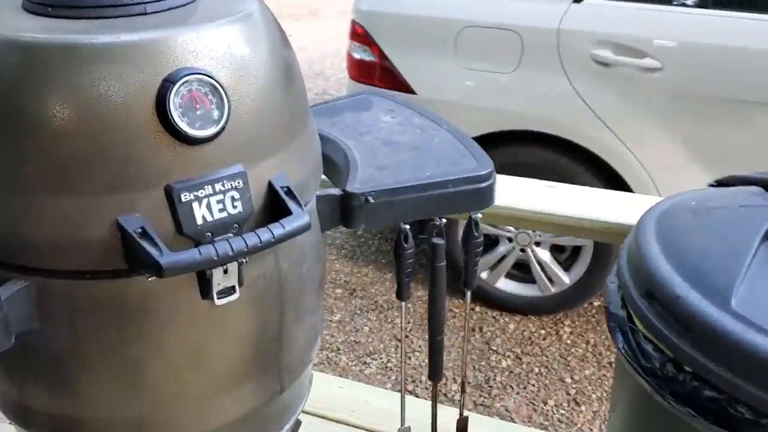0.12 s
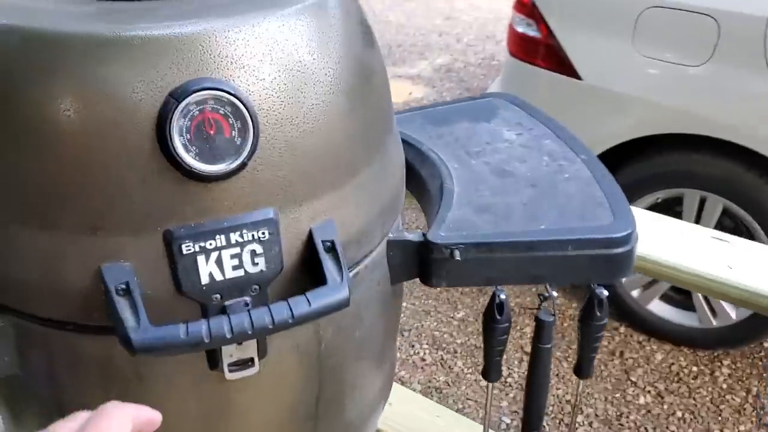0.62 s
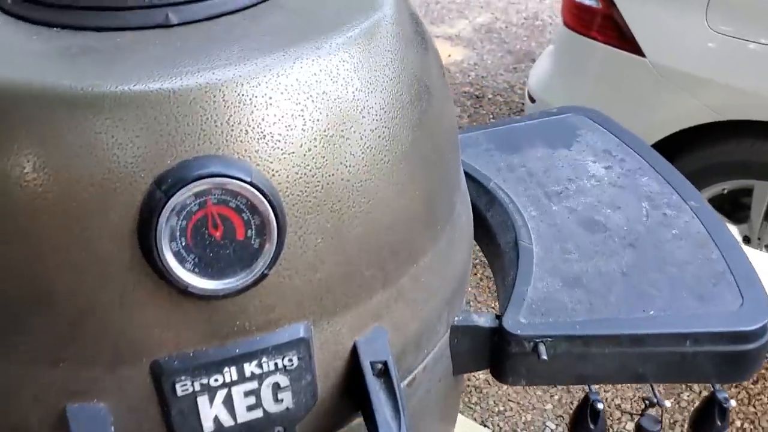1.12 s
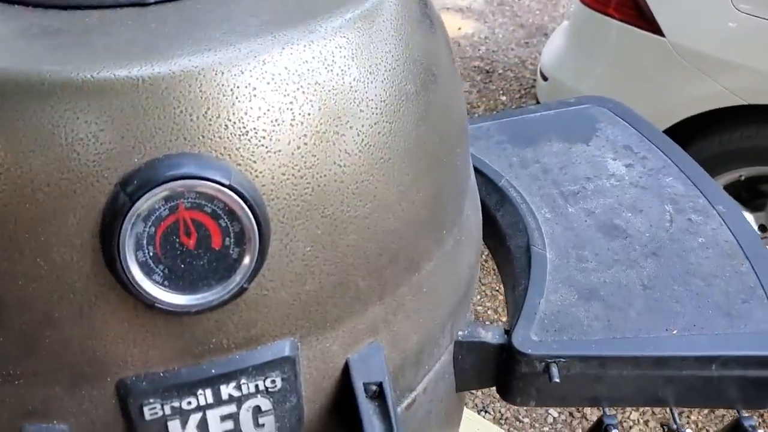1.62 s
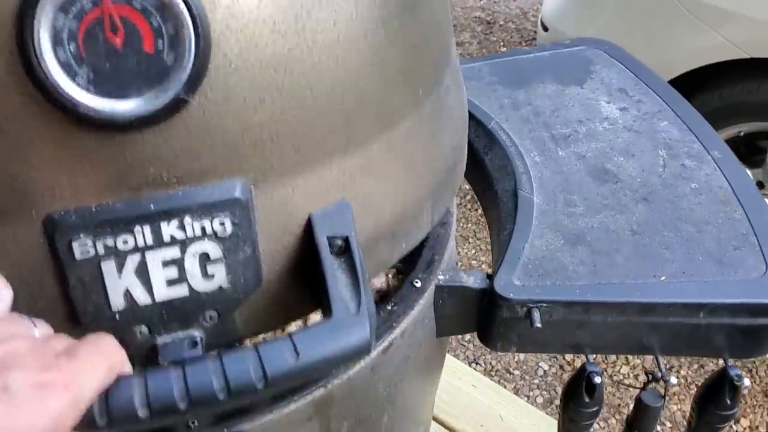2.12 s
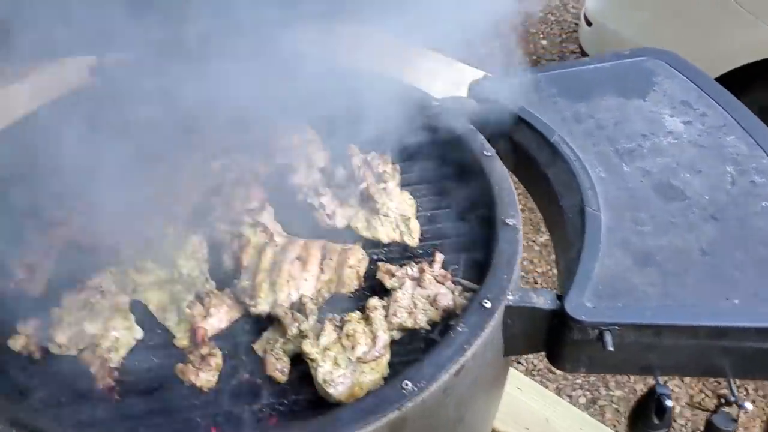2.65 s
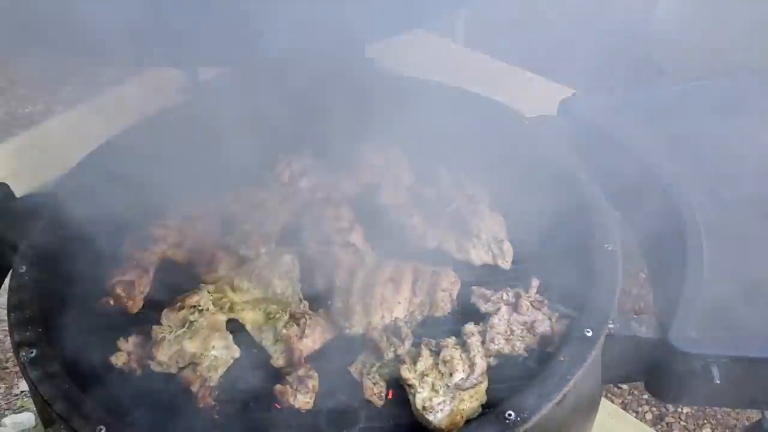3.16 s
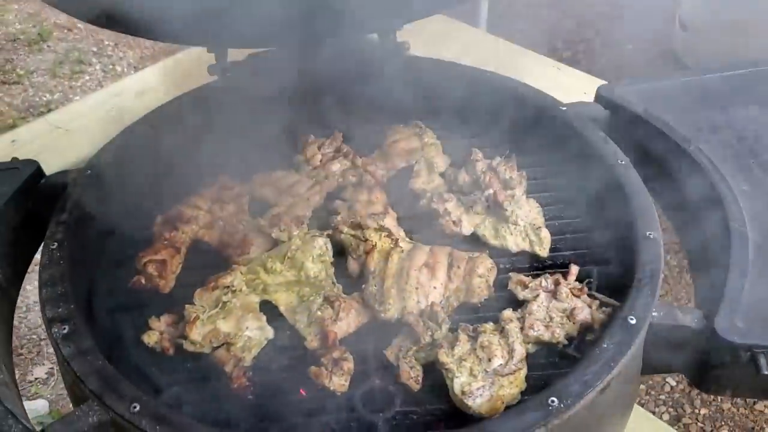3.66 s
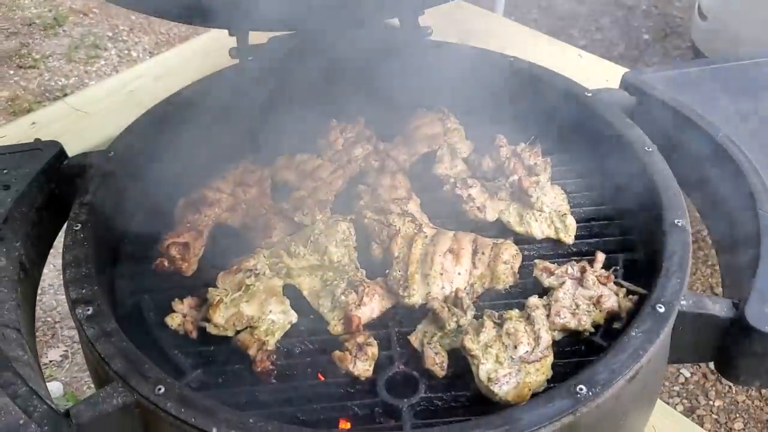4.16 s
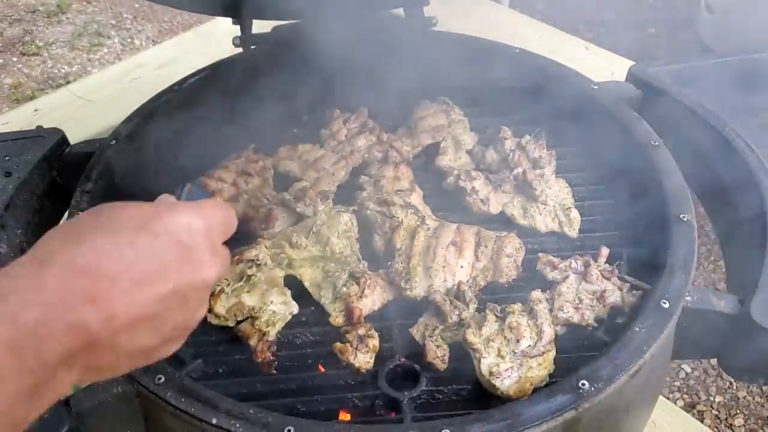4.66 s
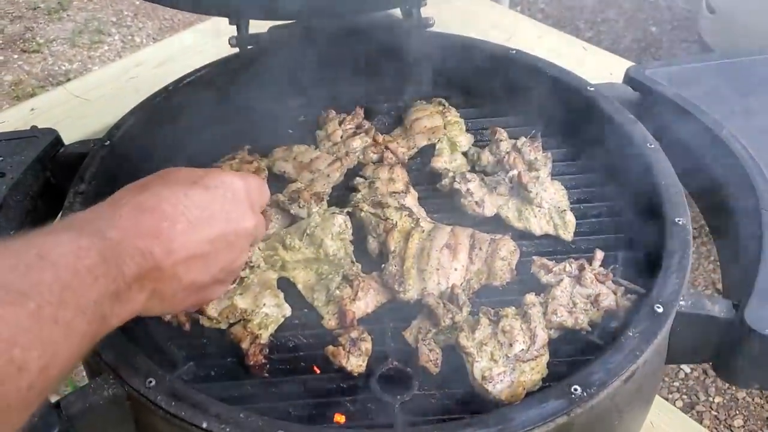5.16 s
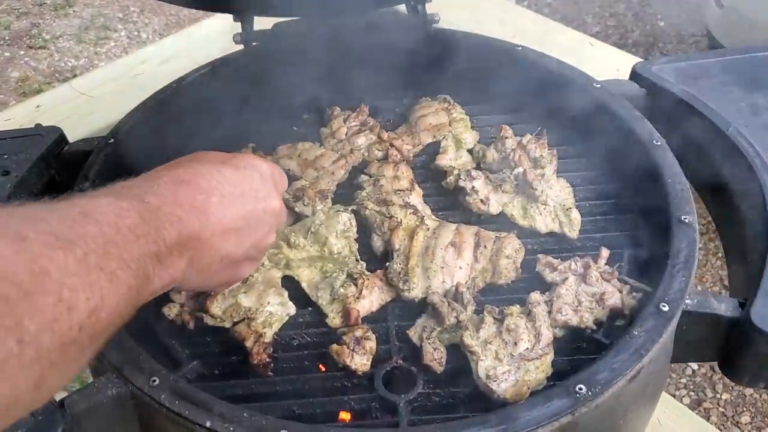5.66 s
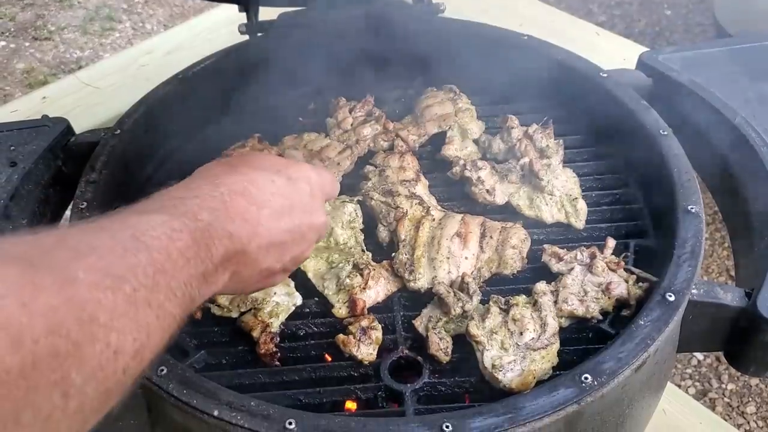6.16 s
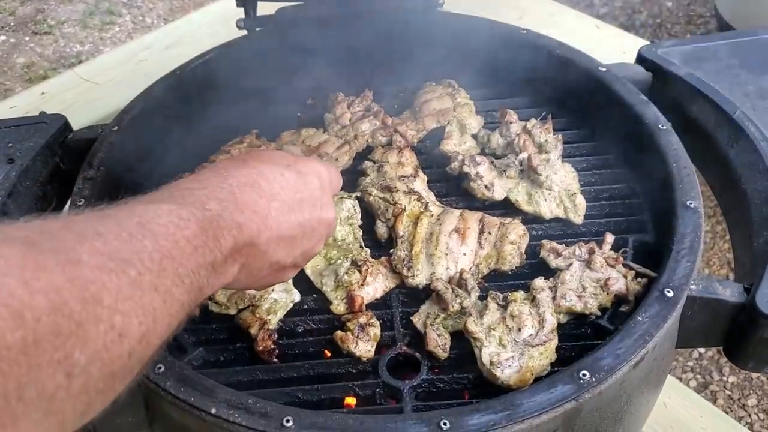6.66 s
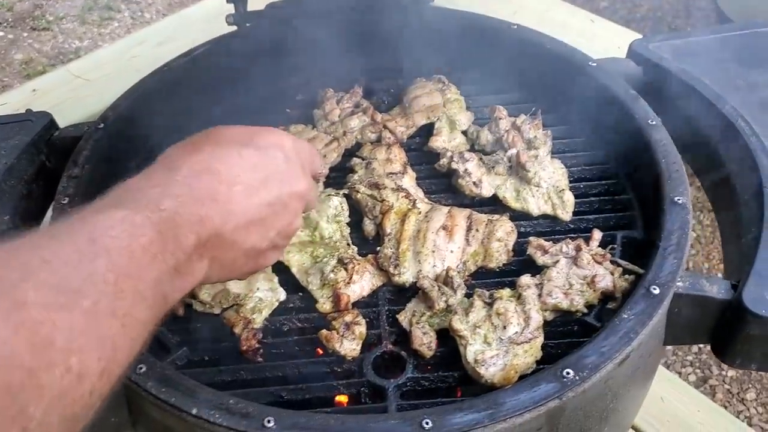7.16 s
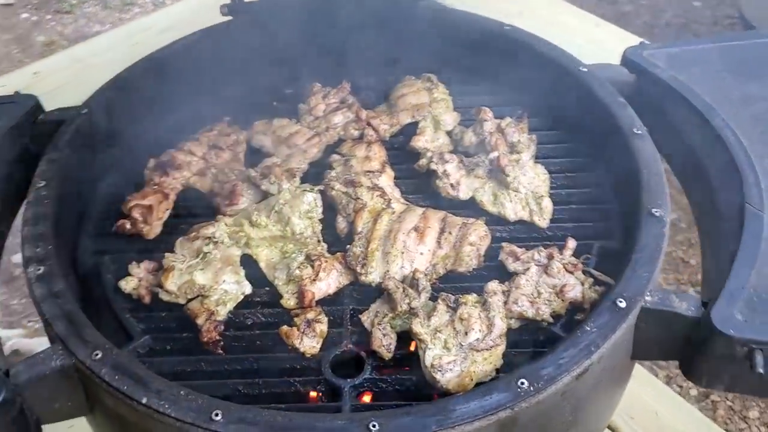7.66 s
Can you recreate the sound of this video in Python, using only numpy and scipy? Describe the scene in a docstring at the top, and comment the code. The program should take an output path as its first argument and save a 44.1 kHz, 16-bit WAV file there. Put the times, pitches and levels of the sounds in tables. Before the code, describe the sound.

Gravelly footsteps and hollow knocks, a bird whistle, a steel catch rubbing, then a squeaking lid opens onto loud, bright, spitting meat sizzle.

```python
"""Meat sizzles on a charcoal grill in a yard (bubbling noise, ringing bubbles) and air stirs (low noise in puffs).
Someone steps up over gravel and boards (grains, ringing modes) amid dull bumps and hollow knocks; a bird
whistles (unsteady sines) as the steel catch slides (rubbed resonances). The lid lifts on a squeaking hinge
(gliding sines) and the hiss opens up; fat spits (short cracks, clicks), feet shift, the bird whistles again,
a tool scrapes the grate (coarse noise), the last time near the end."""
import sys
import numpy as np
from scipy import signal
from scipy.fft import rfft, irfft, next_fast_len
from scipy.io import wavfile
from scipy.ndimage import uniform_filter1d, map_coordinates

SR = 44100
rng = np.random.default_rng(int(sys.argv[2]) if len(sys.argv) > 2 else 0)


def undo_db(level):
    """Turn decibels back into plain size, where 20 dB means ten times bigger."""
    steps = np.asarray(level, float) / 20
    return 10 ** steps


def file_out(sig):
    """Save sig as 16-bit WAV at sys.argv[1]."""
    # one column per channel
    cols = np.atleast_2d(sig).T
    # limit, then scale
    lim = np.clip(cols, -1, 1)
    pcm = np.round(lim * 32767).astype(np.int16)
    wavfile.write(sys.argv[1], SR, pcm)


N = 343539
TOP_HZ = 15780  # band limit


def unit(x):
    """Scales to rms 1."""
    return x / np.sqrt(np.mean(x ** 2) + 1e-20)


def along(points, hz):
    """Interpolates (f/Hz, value) points on a log frequency axis."""
    f, v = np.transpose(points)
    return np.interp(np.log(hz + 1), np.log(f + 1), v)


def curves(rows):
    """One value per sample for each column after the time."""
    s, *cols = np.transpose(rows)
    return [np.interp(np.arange(N) / SR, s, c) for c in cols]


def tent(start, peak, end):
    """0 outside, rising straight to 1 at the peak."""
    return np.interp(np.arange(N) / SR, [start, peak, end], [0, 1, 0])


def sides(pan_db):
    """Left and right gains for a left minus right level."""
    return undo_db(np.array([pan_db / 2, -pan_db / 2]))


def wobble(rate):
    """Smooth random curve, rate knots a second."""
    coarse = np.arange(0, N + 32, 32)
    knots = rng.standard_normal(int(N * rate / SR) + 4)
    return np.interp(np.arange(N), coarse, map_coordinates(knots, [coarse * rate / SR]))


def filtered(x, response):
    """x times a complex response of frequency."""
    m = next_fast_len(N + 8192)
    return irfft(rfft(x, m) * response(np.fft.rfftfreq(m, 1 / SR)), m)[..., :N]


def crackle(rate, spread_db, share):
    """Two unrelated hisses swelled by bubble bursts (rate a second) that both sides hear at the same time."""
    bursts = (rng.random(N) < rate / SR) * undo_db(spread_db * np.tanh(rng.standard_normal(N)))
    puff = unit(signal.lfilter([1], [1, -.95], bursts))  # each burst dies in about a millisecond
    share = np.clip(share, 0, 1)
    return rng.standard_normal((2, N)) * np.sqrt(1 - share + share * puff ** 2)


def patchy(pair, depth_db):
    """Spots of the grate seethe up and fall back, each in its own range of pitch."""
    z = signal.stft(pair, nperseg=512)[2]
    field = uniform_filter1d(rng.standard_normal(z.shape[1:]), size=5, axis=0)
    field = uniform_filter1d(field, size=6, axis=1)
    return signal.istft(z * undo_db(depth_db * unit(field)), nperseg=512)[1][:, :N]


# left-right likeness: f/Hz, correlation
LIKENESS = [(60, 0.98), (340, 0.53), (700, 0.55), (1050, 0.13), (1400, 0.62), (2050, 0.12), (2400, 0),
            (4000, 0.0083), (15000, 0.014)]


def coloured(pair, spectrum, alike=LIKENESS, tilt=((1, 0),), lag=0):
    """Two noises become a stereo sound of rms 1 in the middle; the left side hears it lag seconds late."""
    m = next_fast_len(N)
    hz, (a, b) = np.fft.rfftfreq(m, 1 / SR), rfft(pair, m)
    turn = np.arccos(np.clip(along(alike, hz), -1, 1)) / 2
    mid, side = a * np.cos(turn), b * np.sin(turn)
    late = np.exp(-1j * np.pi * hz * lag)
    gain = undo_db(along(spectrum, hz)) * sides(along(tilt, hz))
    both = irfft(gain * [(mid + side) * late, (mid - side) / late], m)[:, :N]
    return both / np.std(both.mean(0))


def echoes(x, t60, wet_db):
    """The yard answers with a short scattered tail, different on each side."""
    t = np.arange(SR // 2) / SR
    tail = rng.standard_normal((2, len(t))) * undo_db(-60 * t / t60)
    return x + undo_db(wet_db) * signal.fftconvolve(x, tail / np.linalg.norm(tail[0]), axes=1)[:, :N]


def whistles(tables, waver, flutter_db, octave):
    """One gliding sine per table of (t/s, f/Hz, level/dB, pan/dB), unsteady in pitch and strength."""
    out = np.zeros((2, N))
    for rows in tables:
        s, *cols = np.transpose(rows)
        span = slice(round(s[0] * SR), round(s[-1] * SR))
        t = np.arange(N)[span] / SR
        hz, db, pan_db = (np.interp(t, s, c) for c in cols)
        phase = 2 * np.pi * np.cumsum(hz * (1 + waver[span])) / SR
        gate = np.clip(np.minimum(t - s[0], s[-1] - t) / 0.00093, 0, 1)
        tone = np.sin(phase) + octave * (2 * hz < TOP_HZ) * np.sin(2 * phase)
        out[:, span] += np.sqrt(2) * gate * undo_db(db + flutter_db[span]) * tone * sides(pan_db)
    return out


NOTE_PEAK, NOTE_START_DB, NOTE_END_DB = 0.18, -7.5, -5  # loudest share of the way; ends re loudest


def notes(rows, pan_db):
    """Each note glides straight from first to last pitch, swells and fades."""
    return [[(s, a, db + NOTE_START_DB, pan_db),
             (s + NOTE_PEAK * length, a + NOTE_PEAK * (b - a), db, pan_db),
             (s + length, b, db + NOTE_END_DB, pan_db)]
            for s, length, a, b, db in rows]


# spectrum of the air at the microphones: f/Hz, level/dB per Hz
BUFFET_SPECTRUM = [(15, -49), (27, -13), (69, 1.5), (98, 0), (130, -10), (250, -12), (320, -14.5),
                   (550, -120)]
# spectrum of the yard: f/Hz, level/dB per Hz
YARD_SPECTRUM = [(88, -48), (150, 1.5), (188, 1.5), (301, -7), (587, -2.5), (777, -3), (1300, -10),
                 (1690, -4.5), (2860, -120)]
# puffs of air: t/s, buffet level/dB, half length/s, yard swell/dB
AIR_PUFFS = [(0.122, -52, 0.088, 17.5), (0.277, -52, 0.3, 6.5), (0.718, -47, 0.072, 16),
             (0.982, -45, 0.24, 6.5), (1.613, -48, 0.28, 11), (2.077, -55, 0.38, -0.5),
             (2.475, -48, 0.22, 5.5), (3.776, -44.5, 0.081, 10), (4.02, -51, 0.07, 4.5),
             (4.849, -49, 0.11, 13.5), (5.144, -58, 0.29, -1), (5.658, -50, 0.22, 4),
             (6.497, -60.5, 0.63, -1), (7.506, -43, 0.13, 8.5)]
# yard murmur: t/s, level/dB
YARD_MURMUR = [(0, -64.5), (.8, -66.5), (1.3, -70.5), (1.8, -77.5), (2.2, -66), (2.6, -62), (3.4, -62.5),
               (4.2, -62), (5.1, -68.5), (6.1, -63), (7.79, -63)]
CALM_DB, PUFF_EDGE_DB = -68, 13  # buffet between puffs; fall from peak to edge


def air():
    """Puffs buffet the microphones in the bass and swell the smooth murmur of the yard."""
    puffs = [(tent(s - half, s, s + half), db, swell_db) for s, db, half, swell_db in AIR_PUFFS]
    strength = undo_db(CALM_DB)
    strength = strength + sum((shape > 0) * undo_db(db - PUFF_EDGE_DB * (1.5 - shape)) for shape, db, _ in puffs)
    yard_db = curves(YARD_MURMUR)[0] + sum(shape * swell_db for shape, _, swell_db in puffs)
    lumps = undo_db(3 * wobble(6))
    drift_db = 1.6 * wobble(9)
    buffet = coloured(lumps * rng.standard_normal((2, N)), BUFFET_SPECTRUM, alike=[(30, 0.86), (130, .85)])
    murmur = coloured(rng.standard_normal((2, N)), YARD_SPECTRUM)
    return strength * buffet + undo_db(yard_db + drift_db) * murmur


# bird notes and their fading echoes: t/s, length/s, first f/Hz, last f/Hz, level/dB
BIRD_SONG = [(.852, .03, 2720, 2760, -49), (.908, 0.033, 2690, 2800, -43), (.93, 0.031, 2970, 3140, -40),
             (.95, 0.021, 3216, 3300, -37), (.975, 0.043, 2575, 3150, -41), (1.005, .047, 3126, 2600, -41),
             (1.055, 0.059, 2740, 2550, -47.5), (1.105, 0.079, 2700, 2570, -49),
             (1.205, 0.113, 2570, 2600, -62), (1.54, 0.03, 2230, 2550, -47),
             (1.562, 0.025, 2560, 2750, -42), (1.585, 0.05, 2749, 2750, -52), (4.19, .018, 3400, 3200, -50),
             (4.203, 0.027, 3230, 3170, -45.5), (4.26, 0.065, 2170, 2350, -52),
             (4.33, 0.025, 2760, 2930, -49), (4.352, 0.028, 2800, 2500, -46),
             (4.378, 0.022, 2430, 2400, -47), (4.407, 0.04, 2350, 2320, -48),
             (4.775, 0.02, 2600, 2540, -49), (4.8, 0.06, 2410, 2370, -46), (4.862, 0.07, 2375, 2370, -43.5),
             (4.925, 0.05, 2390, 2360, -51), (4.915, 0.055, 2880, 2860, -51),
             (4.965, .075, 2850, 2830, -46), (5.035, .025, 2835, 2835, -47),
             (5.058, 0.06, 2835, 2820, -42.5), (5.115, 0.08, 2850, 2820, -51)]
BIRD_PAN_DB = -5  # left minus right


def bird():
    """Hoarse two-voiced whistle from the trees, wavering and broken up by leaves, with echoes behind it."""
    waver, flutter_db = .004 * wobble(130), 3.8 * np.tanh(wobble(90)) - 1.5
    rasp, rasp_db = .04 + .035 * wobble(200), 5 * np.tanh(wobble(140)) - 9
    song = notes(BIRD_SONG, BIRD_PAN_DB)
    clear = whistles(song, waver, flutter_db, octave=0)
    hoarse = whistles(song, rasp, rasp_db, octave=0)
    return echoes(clear + hoarse, t60=.3, wet_db=-6)


# shoes sliding: start t/s, loudest t/s, end t/s, grit level/dB, dust re grit/dB
SHOE_SLIDES = [(0.06, 0.062, 0.089, -53.5, -14), (0.168, 0.2, 0.2, -41.5, -14),
               (0.663, 0.679, 0.68, -47, -3), (0.724, 0.786, 0.805, -41, -6),
               (1.321, 1.436, 1.492, -34, -6.5)]
# feet coming down: t/s, crunch level/dB, t60/s, dust re crunch/dB, board weight/dB
FOOTFALLS = [(0.088, -30.5, 0.14, -14, -5.5), (.1221, -40.5, 0.32, -3, 0), (0.1397, -35.5, 0.076, 5, -7),
             (0.245, -47.5, 0.36, -16, 8.5), (0.2657, -43.5, 0.15, -19, 13), (0.292, -37.5, 0.1, -19, -20),
             (.403, -39.5, 0.18, -17, 3.5), (0.429, -24, 0.2, -30, -2), (0.4648, -23.5, 0.069, -30, -6.5),
             (0.5588, -43, 0.071, -1, -16), (0.633, -45, 0.16, -10, -22), (0.6817, -30, 0.088, -13, -6),
             (0.7, -38, 0.22, 1, 2.5), (.737, -33.5, 0.096, 8, -22), (0.9774, -42, 0.34, -28, 2),
             (3.094, -31.5, 0.5, 4, -15.5), (3.125, -25.5, 0.081, 0, -20), (3.166, -32, 0.076, -12, -11),
             (3.75, -23.5, 0.094, 0, -26), (3.8077, -31, 0.12, 1, -23), (4.803, -34, 0.27, -8, -10)]
# spectra of stones, dust and sole rub: f/Hz, level/dB per Hz
GRIT_SPECTRUM = [(600, -63), (1050, -17), (1300, -11.5), (2500, -2), (3150, -7), (3700, -4.5), (5000, -14),
                 (6500, -18.5), (9000, -37)]
DUST_SPECTRUM = [(4000, -10), (6500, -4.5), (10000, -3), (15000, 1.5), (16500, 0)]
SOLE_SPECTRUM = [(60, -12), (120, 3.5), (600, -2), (1300, -7.5), (2000, -24)]
# board modes: f/Hz, level/dB, t60/s
BOARD_MODES = [(163, -10.5, 0.036), (332, -8, 0.054), (549.6, 5.5, 0.042), (716, -5.5, 0.054),
               (827, -2.5, 0.044), (990, -2.5, 0.048), (1673, 6.5, 0.025), (2030, 4, 0.035)]
SCUFF_EDGE_DB, SCUFF_SOLE_DB, FEET_PAN_DB = 35, -25.5, -6  # peak to edge; sole re grit; left minus right
SOFT_DULLS = 0.47  # dB per octave a landing loses per dB of board weight above -1.5 dB


def feet():
    """Stones grind in dense grains with dust and sole rub; slides swell and stop, steps decay and ring boards."""
    grit, dust, sole, board = np.zeros((4, 2, N))
    for start, peak, end, db, dust_db in SHOE_SLIDES:
        shape = tent(start, peak, end)
        gate = np.minimum(4 * shape, 1)
        slide = gate * undo_db(db - SCUFF_EDGE_DB * (1 - shape) ** 2.12)
        grit += slide
        dust += slide * undo_db(dust_db)
        sole += gate * undo_db(db + SCUFF_SOLE_DB)
    t = np.arange(SR // 4) / SR
    for s, db, t60, dust_db, board_db in FOOTFALLS:
        span = slice(round(s * SR), round(s * SR) + len(t))
        crunch = undo_db(db - 13.0 - 60 * t / t60) * (1 - np.exp(-t / 0.0012))
        grit[:, span] += crunch
        dust[:, span] += crunch * undo_db(dust_db)
        sole[:, span] += crunch * undo_db(board_db + 1.5)
        dulling = SOFT_DULLS * max(board_db + 1.5, 0)
        for hz, level_db, ring in BOARD_MODES:
            # parts of the board lie nearer one microphone
            lag = rng.normal(0, 0.000094) * np.array([[1], [-1]])
            mode_db = db + board_db + level_db - dulling * np.log2(hz / 400) - 5.5 + rng.normal(0, 2.3)
            size = undo_db(mode_db - 60 * t / ring) * (1 - np.exp(-t / 0.00058))
            board[:, span] += size * np.sin(2 * np.pi * hz * rng.normal(1, 0.028) * (t + lag))
    apart = [(300, 0.97), (1000, 0.14), (5000, 0.11), (12000, .15)]
    grains = crackle(rate=900, spread_db=3, share=.26)
    stones = grit * coloured(grains, GRIT_SPECTRUM, apart, lag=0.00013)
    fine_grains = crackle(rate=260, spread_db=12, share=0.21)
    stones += dust * coloured(fine_grains, DUST_SPECTRUM, apart, lag=0.00011)
    stones *= sides(FEET_PAN_DB)[:, None]
    stones += sole * coloured(rng.standard_normal((2, N)), SOLE_SPECTRUM, apart, lag=0.00012)
    return echoes(stones + board, t60=0.19, wet_db=-13.0)


# hand tool dragged over the grate: start t/s, loudest t/s, end t/s, level/dB
TOOL_SCRAPES = [(4.776, 4.825, 4.885, -42.5), (7.449, 7.455, 7.476, -37), (7.464, 7.486, 7.518, -33.5)]
# spectrum of the grate bars: f/Hz, level/dB per Hz
GRATE_SPECTRUM = [(500, -26), (1000, -15), (1400, -8), (2000, 0), (2700, -2.5), (4000, 0), (5200, -7),
                  (7000, -13), (11000, -43)]
SCRAPE_EDGE_DB = 7  # fall from peak to edge


def scrapes():
    """Metal chatters over the bars: coarse grains that start and stop sharply."""
    shapes = [(tent(start, peak, end), db) for start, peak, end, db in TOOL_SCRAPES]
    stroke = sum(np.minimum(6 * shape, 1) * undo_db(db - SCRAPE_EDGE_DB * (1.0 - shape)) for shape, db in shapes)
    chatter = coloured(crackle(rate=500, spread_db=6, share=.3), GRATE_SPECTRUM, [(1000, 0.22)])
    return stroke * chatter * sides(-3)[:, None]


# dull bumps and hollow knocks: t/s, level/dB, f/Hz, t60/s
BUMPS_AND_KNOCKS = [(.138, -38, 940, 0.05), (.26, -37.5, 418, 0.064), (.426, -28.5, 560, .055),
                    (.461, -30, 575, 0.072), (.68, -40, 620, .06), (.7, -43, 737, 0.1),
                    (.72, -46, 783, 0.075), (1.59, -45, 87.2, 0.41), (2.038, -57, 63, 0.41),
                    (2.374, -47, 152.9, 0.073), (2.385, -28, 141, 0.046), (2.402, -47, 163, 0.25),
                    (2.514, -33.5, 145, 0.07), (2.605, -37, 184, 0.05), (2.892, -48.5, 59, 0.2013),
                    (3.707, -46, 64, 0.13), (3.968, -48.5, 181, 0.09), (4.79, -43, 1400, .1),
                    (4.795, -41.5, 75, 0.2), (4.814, -37.5, 1254, .08), (5.6, -54, 93.5, 0.15),
                    (5.749, -55, 45.4, 0.31), (7.42, -51, 48, .14)]


def bumps():
    """Contacts: a decaying note, a weaker overtone and a dull rattle."""
    out, t = np.zeros(N + SR), np.arange(SR // 2) / SR
    for s, db, hz, t60 in BUMPS_AND_KNOCKS:
        rattle = uniform_filter1d(rng.standard_normal(len(t)), size=40)
        overtone = .22 * np.sin(2 * np.pi * 2.02 * hz * t)
        note = np.sin(2 * np.pi * hz * t) + (overtone + 1.5 * rattle) * undo_db(-60 * t / 0.063)
        out[round(s * SR):][:len(t)] += undo_db(db + 7.5 - 60 * t / t60) * note * (1 - np.exp(-t / 0.0084))
    return out[:N]


# catch strokes on steel: t/s, length/s, first level/dB, last level/dB
CATCH_STROKES = [(0.843, 0.063, -46, -55), (0.911, 0.135, -45.5, -55.5), (1.053, 0.19, -60.5, -63.5),
                 (1.498, 0.107, -45.5, -52), (1.604, .2, -46.5, -66)]
# steel resonances: f/Hz, width/Hz, level/dB
STEEL_MODES = [(1150, 30, -10), (1700, 45, -5), (2047, 35, 0), (2380, 40, -3), (2750, 60, 2), (3020, 45, 0),
               (3290, 50, 3), (3580, 40, 4.5), (4220, 24, 4), (4660, 40, 1), (5120, 40, -3), (5380, 35, -4),
               (5660, 32, 0), (6230, 42, 0), (6600, 40, -7), (6990, 45, -4), (7850, 45, -7),
               (8850, 90, -16), (11800, 750, -14), (14135, 460, -25)]
MODE_SHIFT_RATIO, MODE_SPREAD_DB = .003, 2  # random spread of mode pitch and level per stroke
BARE_SCRAPE = .17


def catch():
    """Rubbing shakes steel resonances nearly fixed in pitch, varied a little at random per stroke, plus bare scrape."""
    t, out = np.arange(N) / SR, np.zeros((2, N))
    rub = undo_db(5.5 + 1.2 * wobble(45)) * crackle(rate=900, spread_db=4, share=.12)
    for s, length, first_db, last_db in CATCH_STROKES:
        gate = np.clip(np.minimum(t - s, s + length - t) / 0.0069, 0, 1)
        stroke = gate * undo_db(np.interp(t, [s, s + length], [first_db, last_db]))
        modes = [(c * rng.normal(1, MODE_SHIFT_RATIO), w, db + rng.normal(0, MODE_SPREAD_DB))
                 for c, w, db in STEEL_MODES]

        def steel(f):
            """Bare path plus resonances of alternating sign."""
            bare = BARE_SCRAPE * (f > 1300) / (1 + f / 9000)
            return bare + sum((-1) ** k * undo_db(db) * 1j * f * w / (c * c - f * f + 1j * f * w)
                              for k, (c, w, db) in enumerate(modes))

        scale = np.sqrt(np.mean(np.abs(steel(np.arange(1, SR / 2, 5))) ** 2))
        span = slice(round(s * SR), round(s * SR) + SR // 2)
        part = (stroke * rub)[:, span]
        out[:, span] += irfft(rfft(part) * steel(np.fft.rfftfreq(SR // 2, 1 / SR)), SR // 2) / scale
    return out


# short squeaks and groans of the metalwork: t/s, length/s, first f/Hz, last f/Hz, level/dB
SHORT_SQUEAKS = [(1.08, .022, 7050, 6500, -62), (1.8, 0.042, 6560, 7300, -52.5),
                 (2.222, 0.036, 7000, 7250, -45.5), (2.25, 0.039, 8000, 7650, -45),
                 (2.28, 0.027, 6900, 6600, -40), (2.305, 0.053, 884, 990, -61)]
# long swing of the lid: t/s, f/Hz, level/dB
LID_SWING = [(2.53, 7387, -44), (2.55, 7220, -39), (2.578, 7920, -38), (2.6, 8160, -36), (2.622, 8720, -35),
             (2.758, 8470, -43), (2.814, 8950, -40), (2.88, 7760, -46.5), (2.972, 8400, -54),
             (2.98, 8249, -59)]
SQUEAK_PAN_DB, SWING_PAN_DB = 9.5, (10, -10.5)  # left minus right; the swing crosses at its start


def hinge():
    """Fast stick-slip: an unsteady, fluttering squeak with its octave."""
    start = LID_SWING[0][0]
    swing = [(s, hz, db, np.interp(s - start, [0, .1], SWING_PAN_DB)) for s, hz, db in LID_SWING]
    tables = notes(SHORT_SQUEAKS, SQUEAK_PAN_DB) + [swing]
    squeak = whistles(tables, 0.0094 * wobble(300), 3.1 * wobble(150), octave=0.21)
    return echoes(squeak, t60=.1, wet_db=-7)


# spits of fat: t/s, level/dB, f/Hz, left minus right/dB
FAT_SPITS = [(2.6075, -31, 2540, 4), (3.969, -37, 2060, -2), (4.249, -38, 4500, -9),
             (4.252, -26.5, 2820, -4), (4.484, -40, 2900, -3), (4.4885, -40, 3880, -1),
             (5.66, -43, 12700, -2), (5.9279, -38, 1960, -5), (6.087, -38, 11400, -1),
             (6.1668, -38, 2090, 0), (6.265, -33, 4200, -3), (6.283, -33, 2700, -4.5),
             (6.325, -35, 7040, 0), (6.376, -32, 2860, -6), (6.381, -36, 3500, -9)]


def spits():
    """A drop of fat bursts: a short noisy crack at two pitches, with the lows filtered out."""
    out, t = np.zeros((2, N + SR)), np.arange(400) / SR
    for s, db, hz, pan_db in FAT_SPITS:
        pop = np.sin(2 * np.pi * hz * t) + 0.77 * np.sin(2 * np.pi * 0.56 * hz * t)
        pop = pop + 1.56 * rng.standard_normal((2, len(t)))
        out[:, round(s * SR):][:, :len(t)] += undo_db(db - 2 - 60 * t / .012) * pop * sides(pan_db)[:, None]
    return signal.sosfilt(signal.butter(2, 900, "high", fs=SR, output="sos"), out[:, :N])


# frying, muffled under the closed lid, then louder as it lifts; also drives bubbles and sizzle: t/s, level/dB
FRYING = [(0, -61), (.45, -68.5), (.8, -72), (1.28, -69), (1.75, -60), (2.0, -57.5), (2.27, -53.5),
          (2.4, -43.5), (2.55, -44.5), (2.7, -40), (2.96, -45), (3.42, -46.5), (3.9, -44), (4.4, -45.5),
          (5.3, -47), (6.1, -45), (6.58, -46), (6.76, -38), (7.5, -41.5), (7.79, -45)]
TICKS_PER_S, TICK_DB = 55, 7  # rate before clumping; least click re frying, before the band filter


def ticks():
    """Droplets burst over the open grate: sharp clicks in random clumps, a few much louder than the rest."""
    level_db, = curves(FRYING)
    hits = rng.random(N) < TICKS_PER_S / SR * undo_db(6 * wobble(8))
    size_db = level_db + TICK_DB + 3.9 * np.minimum(rng.exponential(size=N), 2.5)
    band = signal.butter(2, [1500, 9000], "band", fs=SR, output="sos")
    click = signal.sosfilt(band, hits * undo_db(size_db) * rng.choice([-1, 1], N))
    return click * sides(3 * wobble(18))


# spectrum of the frying body; also weights bubbles by pitch: f/Hz, level/dB per Hz
BODY_SPECTRUM = [(600, -22.5), (950, -18), (1250, -17), (1450, -9), (1600, -4.5), (1800, -5), (2050, 1.5),
                 (2300, -2), (2750, 1), (3450, -1.5), (3950, 0.5), (6400, -1), (7000, 0.5), (7600, -9),
                 (11000, -15.5)]
BUBBLES_PER_S, BUBBLE_HZ = 160, 3300  # median starting pitch
FADE_20DB_CYCLES, BUBBLE_DB = 14, -1  # cycles at starting pitch; gain re frying


def bubbles():
    """Larger bubbles ring for a few cycles, rising in pitch, each at its own place on the grate."""
    draw = rng.standard_normal((int(BUBBLES_PER_S * N / SR), 3))
    start, t = rng.integers(0, N, len(draw))[:, None], np.arange(700) / SR
    hz = BUBBLE_HZ * np.exp(0.421 * draw[:, :1])
    size_db = along(BODY_SPECTRUM, hz) + 2.7 * np.tanh(draw[:, 1:2])
    ring = undo_db(size_db - 20 * t * hz / FADE_20DB_CYCLES) * (1 - np.exp(-t / 0.00043))
    ring = ring * np.sin(2 * np.pi * hz * t * (1 + 4 * t))
    where = (start + np.arange(len(t))).ravel()
    both = [np.bincount(where, (ring * gain).ravel(), N + len(t))[:N] for gain in sides(5 * draw[:, 2:])]
    return undo_db(curves(FRYING)[0] + BUBBLE_DB) * np.array(both)


# spectra of fizz and of low seething in the bowl: f/Hz, level/dB per Hz
FIZZ_SPECTRUM = [(4500, -50), (7500, -10), (8600, -8), (10100, -4), (10500, -6), (11400, -1.5),
                 (13200, -0.5), (14600, 1), (15300, 4.5), (16000, -2.5)]
SEETHE_SPECTRUM = [(500, -18), (800, -8), (1050, 0), (1400, 2.5), (1750, -2.5), (2400, -31)]
# seething let out past the lifted lid: t/s, level re body/dB
SEETHE_ESCAPE = [(2.3, -23), (2.45, -19), (2.7, -10), (3.0, -14), (5.2, -15), (6.0, -16.5), (6.8, -15.5),
                 (7.79, -18)]
# stereo tilt: f/Hz, left minus right/dB
SIZZLE_TILT = [(60, -30), (130, -21), (290, 0), (640, 12), (1410, -7), (3100, -4.5), (6820, 2.5),
               (15000, -2)]
# flares of steam: t/s, fizz rise/dB, half length/s
STEAM_FLARES = [(2.25, 5, 0.028), (2.408, 2, 0.068), (2.67, 3.5, 0.078), (3.117, 3.5, 0.11),
                (3.55, 2, 0.16), (3.777, 4.5, 0.08), (4.485, 2.5, 0.021), (4.66, 3.5, 0.062),
                (5.395, 4.5, 0.067), (5.588, 3, 0.2), (6.098, 3.5, 0.017), (6.965, 3, 0.012)]
BODY_FLARES = 0.59  # share of a flare's dB that the body follows
LID_CRACKS_S, LID_OPENING_S = 1.6, 0.4  # seal breaks; time until the fizz is free
FIZZ_SHUT_DB, FIZZ_OPEN_DB = -2.5, 7.5  # re frying
PATCH_DB = 1.4


def sizzle():
    """Juice boils: slower bubbles make the body, tiny ones and steam the fizz; both surge together."""
    level_db, = curves(FRYING)
    lid_db, = curves([(LID_CRACKS_S, FIZZ_SHUT_DB), (LID_CRACKS_S + LID_OPENING_S, FIZZ_OPEN_DB)])
    flare_db = sum(db * tent(s - half, s, s + half) for s, db, half in STEAM_FLARES)
    surge_db = .45 * wobble(15) + .85 * wobble(35)
    body_db = level_db + BODY_FLARES * flare_db + surge_db + 0.17 * wobble(3.84)
    fizz_db = level_db + lid_db + flare_db + surge_db + 0.52 * wobble(11)
    boil = patchy(crackle(rate=540, spread_db=3, share=0.19), PATCH_DB)
    body = coloured(boil, BODY_SPECTRUM, tilt=SIZZLE_TILT)
    seethe = coloured(crackle(rate=300, spread_db=6, share=0.23), SEETHE_SPECTRUM, tilt=SIZZLE_TILT)
    body += undo_db(curves(SEETHE_ESCAPE)[0]) * seethe
    fizz = coloured(crackle(rate=600, spread_db=8, share=.22), FIZZ_SPECTRUM, tilt=SIZZLE_TILT)
    return undo_db(body_db) * body + undo_db(fizz_db) * fizz


def scene():
    """Sum of all sources, background first."""
    background = air() + bird()
    handling = feet() + scrapes() + bumps() + catch() + hinge()
    return background + handling + spits() + ticks() + bubbles() + sizzle()


def roll_off(x):
    """The treble ends steeply here."""
    return signal.sosfilt(signal.butter(12, 17100, fs=SR, output="sos"), x)


HISS_DB = -68.5  # white noise before differencing


def record(dry):
    """Adds the microphones' thin, high noise and keeps nothing above the band limit."""
    hiss = undo_db(HISS_DB) * np.gradient(rng.standard_normal(dry.shape), axis=1)
    mix = filtered(dry + hiss, lambda hz: hz < TOP_HZ)
    return roll_off(mix)


dry = scene()
out = record(dry)
file_out(out)
```